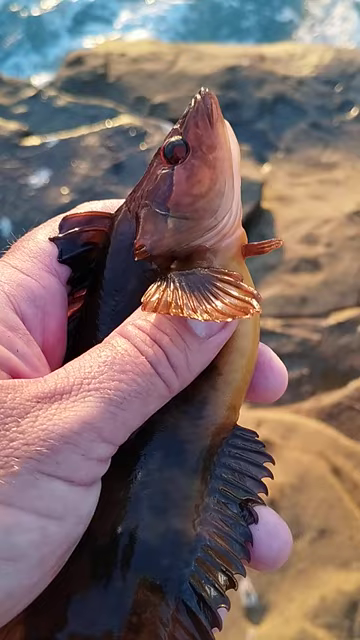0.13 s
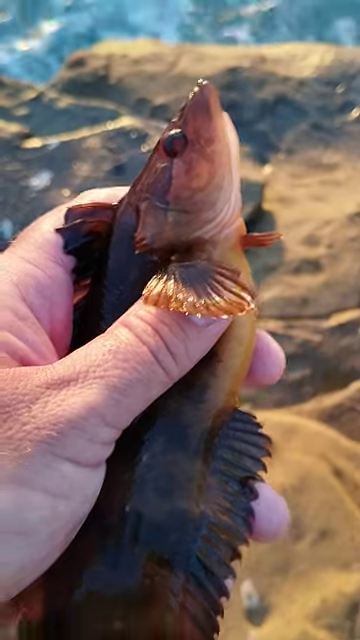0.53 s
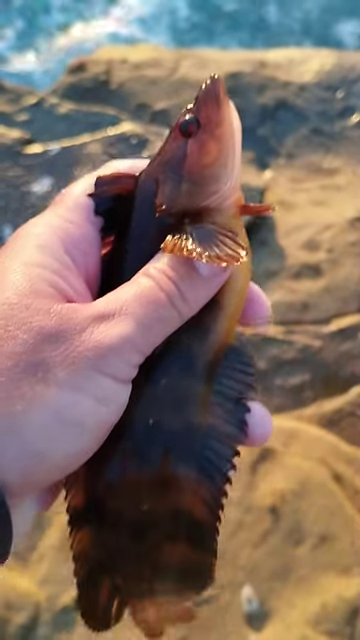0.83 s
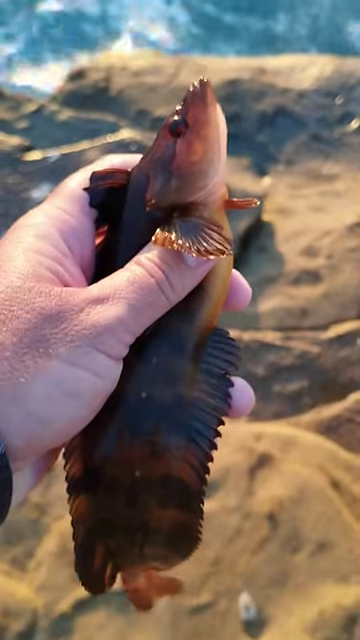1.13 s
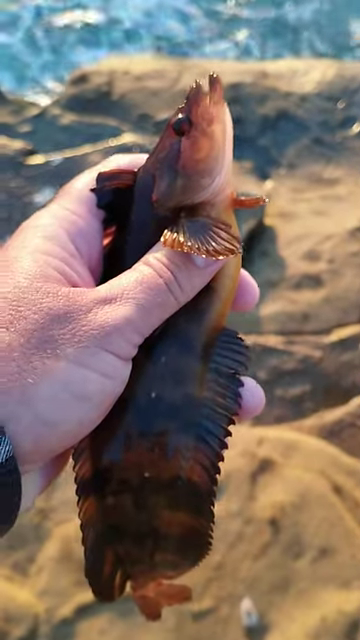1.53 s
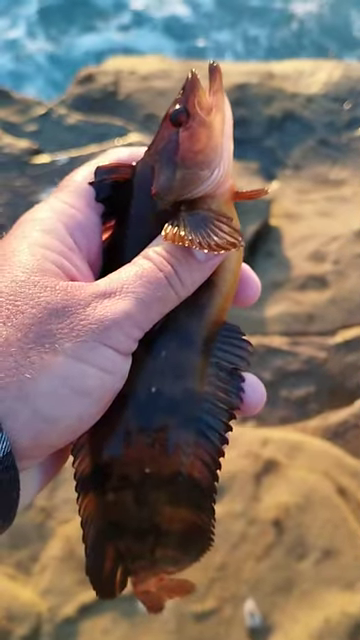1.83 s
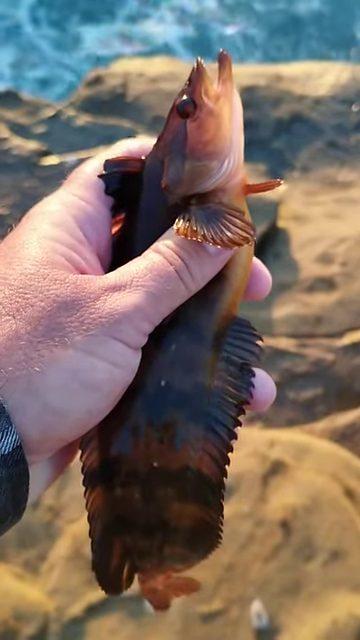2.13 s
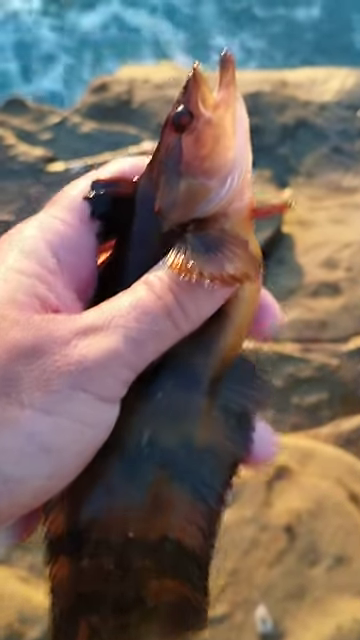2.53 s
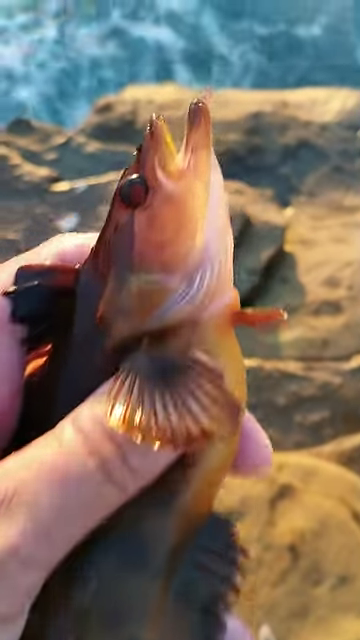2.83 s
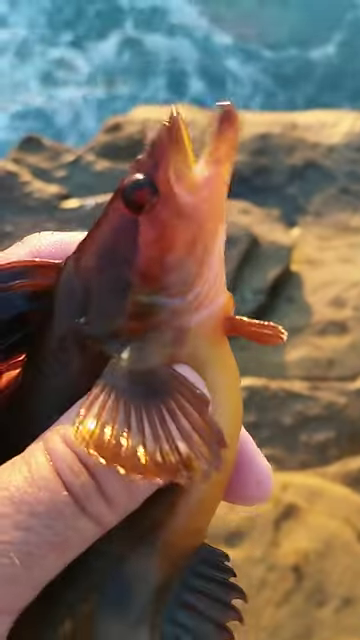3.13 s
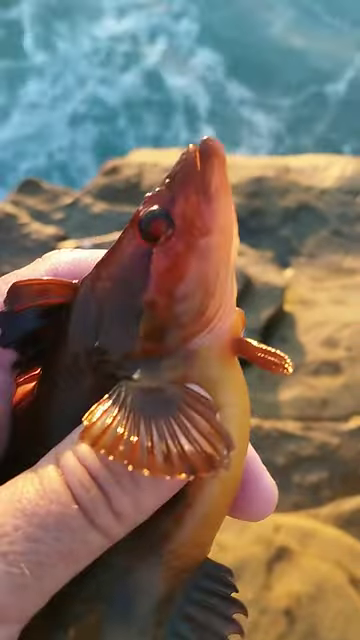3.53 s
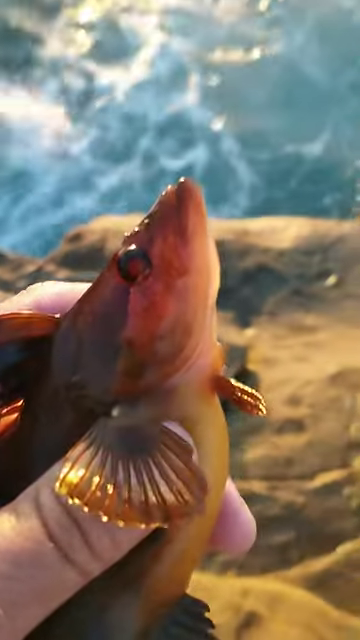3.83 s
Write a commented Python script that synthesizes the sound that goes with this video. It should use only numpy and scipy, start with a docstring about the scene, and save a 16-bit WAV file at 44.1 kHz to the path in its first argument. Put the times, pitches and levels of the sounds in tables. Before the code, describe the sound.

Sea surf roars and fizzes until a closer wave booms, gurgles and sprays over stone.

```python
"""A steady wash of surf roars and fizzes, heard from a rock ledge a few metres above the water.
The roar is turbulence with large ringing bubbles; the fizz is foam with small ones. Past the middle
a wave churns in, throws up hissing spray and booms as the air trapped beneath it resonates; it gulps
in hollows and slaps on stone. Two microphone ports colour the treble differently left and right."""
import sys
import numpy as np
from scipy import signal
from scipy.fft import rfft, irfft
from scipy.io import wavfile
from scipy.ndimage import uniform_filter1d

SR = 44100
rng = np.random.default_rng(int(sys.argv[2]) if len(sys.argv) > 2 else 0)


def int16_out(signal):
    """Quantize to a 16-bit WAV file."""
    q = np.round(np.clip(np.atleast_2d(signal).T, -1, 1) * 32767)
    wavfile.write(sys.argv[1], SR, q.astype(np.int16))


N = 176400
T = np.arange(N) / SR
HZ = np.maximum(np.arange(N // 2 + 1) * SR / N, 1)
CUTOFF_HZ = 15900

# Stereo field of the whole shore: (frequency [Hz], coherence [0-1], phase lead of the left [rad])
WASH_FIELD = [(100, .99, 0), (300, .955, -.03), (500, .66, -.05), (700, .15, .5), (850, .3, 1.6),
              (1050, .4, 1.45), (2000, .28, 1.2), (3000, .15, 3), (4500, .35, 5.1), (5500, .15, 7),
              (8000, 0, 7)]
# Stereo field of the near wave: (frequency [Hz], coherence [0-1], phase lead of the left [rad])
WAVE_FIELD = [(100, .99, -.08), (300, .94, -.25), (500, .76, -.48), (750, .6, -.45), (1100, .68, .15),
              (2000, .78, .15), (2500, .35, 1), (3300, .5, 3.4), (4400, .5, 4.2), (6000, .1, 5.5),
              (8000, 0, 6)]


def from_db(db):
    """Amplitude ratio of a level in decibels."""
    return 10 ** (np.asarray(db) / 20)


def unit_rms(x):
    """Normalisation to unit mean power."""
    return x / np.sqrt(np.mean(x ** 2) + 1e-20)


def over_time(rows):
    """Linear interpolation of each column at every sample."""
    times, *columns = np.transpose(rows)
    return [np.interp(T, times, c) for c in columns]


def over_hz(rows):
    """Interpolation of each column on a logarithmic frequency axis."""
    hz, *columns = np.transpose(rows)
    return [np.interp(np.log(HZ), np.log(hz), c) for c in columns]


def drift(rate_hz):
    """Slow random fluctuation: low-pass filtered noise of unit RMS."""
    hop, settle = 40, 2000
    pole = np.exp(-2 * np.pi * rate_hz * hop / SR)
    noise = rng.standard_normal(N // hop + settle + 2)
    slow = signal.lfilter([1], [1, -2 * pole, pole * pole], noise)[settle:]
    return np.interp(np.arange(N) / hop, np.arange(len(slow)), unit_rms(slow))


def turbulence(depth_db, rate_hz):
    """Random amplitude modulation: the octaves of two white noises swell and sink, partly together."""
    white = rfft(rng.standard_normal((2, N)))
    common = drift(rate_hz / 2)
    octave = np.clip(np.log2(HZ / 40), 0, 9)
    out = 0
    for k in range(10):
        band = irfft(white * np.maximum(1 - abs(octave - k), 0), N)
        out = out + band * from_db(depth_db * (common + drift(rate_hz)))
    return unit_rms(out)


def pings(per_s, low_hz, high_hz, cycles, spread_db, pitches=24):
    """Bubbles or drops as damped resonators, struck at random and decaying 60 dB in `cycles` periods."""
    out = np.zeros((2, N))
    for hz in np.geomspace(low_hz, min(high_hz, CUTOFF_HZ), pitches):
        draws = np.random.default_rng(rng.integers(1 << 30))
        when, side, size, sign = draws.random((int(per_s * N / SR / pitches) + 1, 4)).T
        strength = from_db(spread_db * np.minimum(-np.log(1 - size), 4))
        impulses = np.full((2, N), 1e-18)
        impulses[(side * 2).astype(int), (when * N).astype(int)] = np.sign(sign - .5) * strength
        pole = np.exp(-np.log(1000) * hz / (cycles * SR))
        omega = 2 * np.pi * hz / SR
        out += signal.lfilter([omega, -omega], [1, -2 * pole * np.cos(omega), pole * pole], impulses)
    return unit_rms(out)


def stereo(pair, spectrum, field, mono_below_hz=170):
    """Partial coherence: two independent signals, filtered and mixed to left and right at unit RMS."""
    mid, side = rfft(pair) * from_db(over_hz(spectrum)[0])
    coherence, lead = over_hz(field)
    diffuse = (1 - np.clip(coherence, 0, .995)) * HZ ** 2 / (HZ ** 2 + mono_below_hz ** 2)
    mid, side = mid * np.sqrt(2 - diffuse), side * np.sqrt(diffuse)
    return unit_rms(irfft([(mid + side) * np.exp(1j * lead), mid - side], N))


def stereo_noise(spectrum, field):
    """Gaussian noise of a given spectral shape and coherence."""
    return stereo(rng.standard_normal((2, N)), spectrum, field)


def bursts(rows):
    """Amplitude envelope of Gaussian pulses that add in power."""
    return np.sqrt(sum(from_db(db) ** 2 * np.exp(-((T - peak) / half) ** 2) for peak, db, half in rows))


def wash():
    """Bubble resonance rises as size falls: large bubbles roar in white water, small ones fizz in foam."""
    # Strength of the wash: (time [s], relative roar level [dB], relative foam level [dB])
    levels = [(0.33, -30, -44), (0.46, -30, -45), (0.56, -29, -44.5), (0.69, -28, -43.5),
              (0.88, -29.5, -43), (1.0, -29.5, -42), (1.17, -29, -42), (1.35, -29, -42.5), (1.52, -30, -44),
              (1.73, -27.5, -44.5), (1.9, -29, -43.5), (2.06, -29, -44), (2.2, -27.5, -43.5),
              (2.4, -28, -43.5)]
    # Spectrum of the roar: (frequency [Hz], relative density [dB])
    roar_spectrum = [(20, -14), (60, -4), (150, -2), (220, 0), (295, 2), (500, -5), (750, -10.5),
                     (1000, -14), (1400, -19), (2200, -27.5), (4000, -33), (16000, -65)]
    # Spectrum of the foam: (frequency [Hz], relative density [dB])
    foam_spectrum = [(300, -14), (1500, 8), (3000, 1.5), (4600, 3), (6500, -5), (10000, -9), (16000, -12)]
    roar_db, foam_db = over_time(levels)
    roar = turbulence(depth_db=0.56, rate_hz=10)
    roar += from_db(-11) * pings(1200, 219.2, 2217, cycles=19.3, spread_db=1.5)
    foam = turbulence(depth_db=0.1, rate_hz=12)
    foam += from_db(-10.5) * pings(5000, 1860, 14200, cycles=28, spread_db=3)
    return (from_db(roar_db - 0.5) * stereo(roar, roar_spectrum, WASH_FIELD)
            + from_db(foam_db - 1.5) * stereo(foam, foam_spectrum, WASH_FIELD))


def rumble():
    """Low-frequency noise under a slow envelope lies beneath the surf."""
    # Strength of the rumble: (time [s], level [dB])
    levels = [(.14, -53), (.3, -48), (.32, -33), (.6, -36), (.78, -36.5), (1.05, -32.5), (1.4, -38.5),
              (1.8, -37.5), (2.2, -36.5), (2.45, -32), (3.1, -32), (4.0, -30.5)]
    # Spectrum of the rumble: (frequency [Hz], relative density [dB])
    spectrum = [(8, 2.5), (30, -2.5), (55, -1), (90, -2.5), (150, -8.5), (300, -24.5), (1000, -62)]
    return from_db(over_time(levels)[0]) * stereo_noise(spectrum, WASH_FIELD)


def surge():
    """Turbulent flow and ringing bubbles: the near wave churns and gurgles over the rocks."""
    # Strength of the churning: (time [s], level [dB])
    levels = [(2.25, -46), (2.45, -34), (2.55, -29), (2.64, -31.5), (2.7, -40), (2.79, -32.5), (2.9, -32),
              (3.1, -34), (3.3, -37), (3.4, -28.5), (3.56, -27), (3.64, -26), (3.77, -24), (3.9, -28),
              (3.98, -25.5)]
    # Spectrum of the churning: (frequency [Hz], relative density [dB])
    spectrum = [(40, -17), (130, 5), (260, 1), (450, -1), (720, -6.5), (1300, -16), (2100, -20),
                (4200, -30), (16000, -42)]
    water = turbulence(depth_db=0, rate_hz=8.2)
    water += from_db(-10) * pings(1400, 203.5, 2580, cycles=13.6, spread_db=3)
    return from_db(over_time(levels)[0]) * stereo(water, spectrum, WAVE_FIELD)


def spray():
    """Superposed impacts: fine drops, each heavily damped, hiss and patter on the stone."""
    # Spray thrown up and falling back: (time [s], level [dB])
    levels = [(2.3, -67), (2.47, -46), (2.7, -47.5), (2.77, -44), (2.86, -48), (2.96, -44.5), (3.13, -47),
              (3.22, -37), (3.31, -35.5), (3.38, -32.5), (3.48, -33), (3.65, -34.5), (3.72, -39.5),
              (4.0, -38)]
    # Spectrum of the spray: (frequency [Hz], relative density [dB])
    spectrum = [(300, 15), (1000, -6), (2000, 4), (3000, 3.5), (4200, 8), (6500, -3.5), (10000, -6.5),
                (16000, -10)]
    drops = turbulence(depth_db=0.9, rate_hz=17)
    drops += from_db(-2.5) * pings(5000, 840, 16400, cycles=5, spread_db=3)
    return from_db(over_time(levels)[0]) * stereo(drops, spectrum, WAVE_FIELD)


def booms(smoothing_s=0.017):
    """Air-pocket resonance: air trapped under the wave rings deeply at each thud on the rocks."""
    # Thuds of the swell: (peak time [s], level [dB], half-width [s])
    thuds = [(2.531, -23, 0.02), (2.59, -22, 0.027), (2.77, -33, 0.025), (2.965, -25.5, .028),
             (3.055, -23.5, 0.051), (3.195, -22, 0.021), (3.26, -24, .018), (3.44, -25.5, 0.018),
             (3.55, -24.5, 0.018), (3.68, -23.5, 0.044), (3.91, -24.5, 0.02)]
    # Resonance of the trapped air: (frequency [Hz], relative density [dB])
    spectrum = [(15, -25), (38, -9.5), (54, 0.5), (70, 1.5), (92, -6), (150, -16.5), (300, -32),
                (1000, -71)]
    ring = stereo_noise(spectrum, WAVE_FIELD)
    window = int(smoothing_s * SR)
    power = np.mean(ring ** 2, axis=0)
    power = uniform_filter1d(uniform_filter1d(power, window), window)
    even_ring = ring / np.sqrt(power + 1e-6)  # so that each thud keeps its strength
    return bursts(thuds) * even_ring


def gulps():
    """Cavity resonance: water gulps in the hollows of the rock."""
    # Gulps of water: (peak time [s], level [dB], half-width [s])
    events = [(2.535, -23, 0.029), (2.805, -28, 0.024), (2.94, -26, 0.02), (3.19, -25.5, 0.011),
              (3.7, -25.5, 0.056), (3.775, -33, 0.025)]
    # Resonances of the hollows: (frequency [Hz], relative density [dB])
    spectrum = [(50, -22), (110, -8.5), (148, 0.5), (185, -3.5), (260, 3), (330, -4.5), (420, -2),
                (700, -20), (1500, -29), (5000, -60)]
    return bursts(events) * stereo_noise(spectrum, WAVE_FIELD)


def slaps():
    """Impact noise: water striking bare stone radiates short broadband bursts."""
    # Impacts of water: (peak time [s], level [dB], half-width [s])
    impacts = [(2.555, -41, 0.011), (2.643, -35, 0.012), (2.79, -37.5, 0.051), (3.395, -33, 0.013),
               (3.64, -39, 0.013)]
    # Spectrum of an impact: (frequency [Hz], relative density [dB])
    spectrum = [(150, -20), (600, 9), (1100, 3), (2200, -8.5), (4000, -8), (7000, -24), (15000, -28)]
    return bursts(impacts) * stereo_noise(spectrum, WAVE_FIELD)


def scene():
    """Linear superposition of all the sources on the shore."""
    return wash() + rumble() + surge() + spray() + booms() + gulps() + slaps()


def record(dry):
    """Linear filtering by the microphone ports, then a brief fade-in and a steep low-pass."""
    # Frequency response of the ports: (frequency [Hz], left gain [dB], right gain [dB])
    ports = [(60, 1.6, 2.35), (198, 0.4, 0.5), (526, -3, 1.25), (740, -1, 3), (1000, -0.2, 2.2),
             (1800, 0.05, 2.07), (2960, 4.5, 1.5), (4250, 1, 4), (6600, 3, 2.5), (7360, 1, -1),
             (8200, -7, -17), (8780, 0, -11), (9900, 4, -9), (11000, 1.5, -22), (12300, 8, -9),
             (15500, 11, 0), (17100, -21, -10)]
    start_s, fade_s, fade_from_db = 0.141, 0.19, -7
    coloured = irfft(rfft(dry) * from_db(over_hz(ports)), N)
    fade_in = (T > start_s) * from_db(fade_from_db * np.clip(1 - (T - start_s) / fade_s, 0, 1))
    low_pass = 1 / np.sqrt(1 + (HZ / CUTOFF_HZ) ** 500)
    return irfft(rfft(coloured * fade_in) * low_pass, N)


dry = scene()
out = record(dry)
int16_out(out)
```